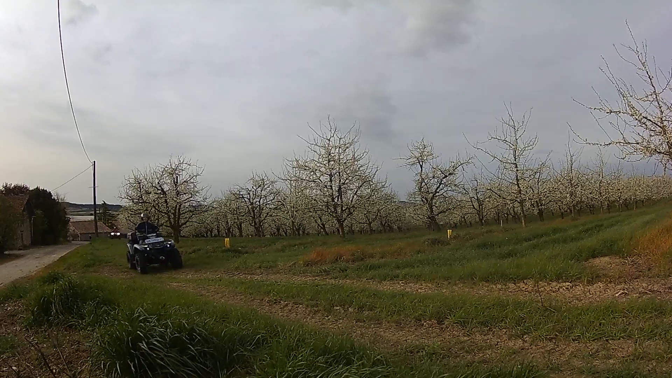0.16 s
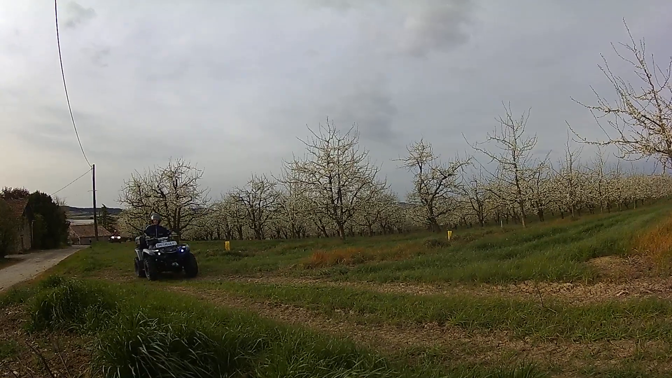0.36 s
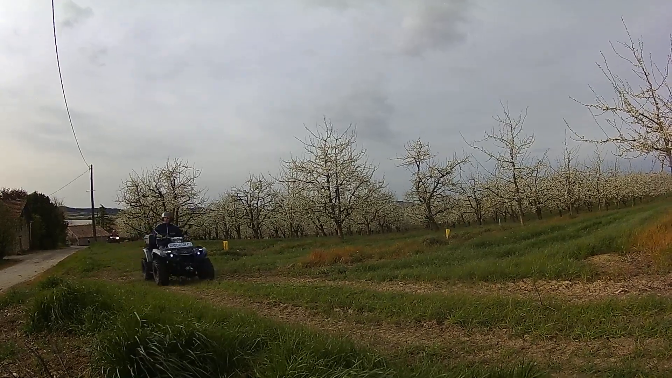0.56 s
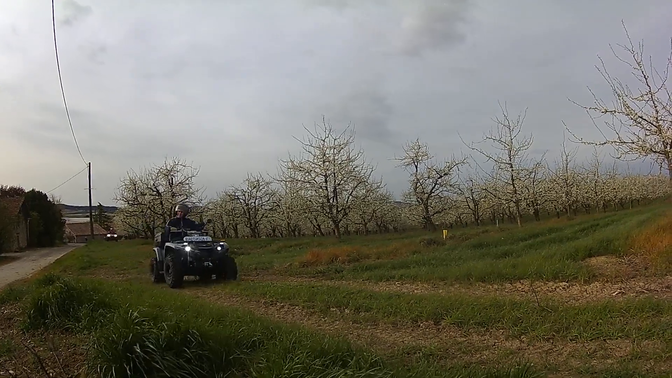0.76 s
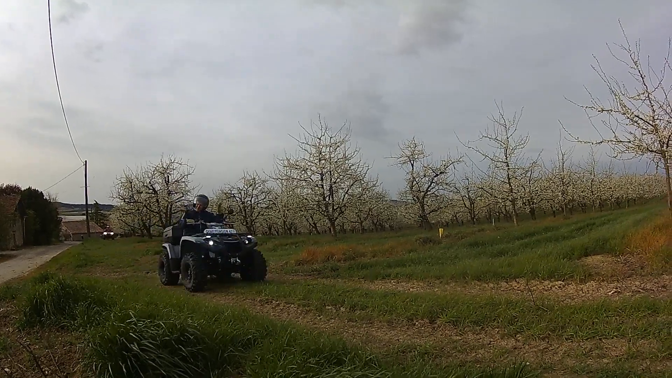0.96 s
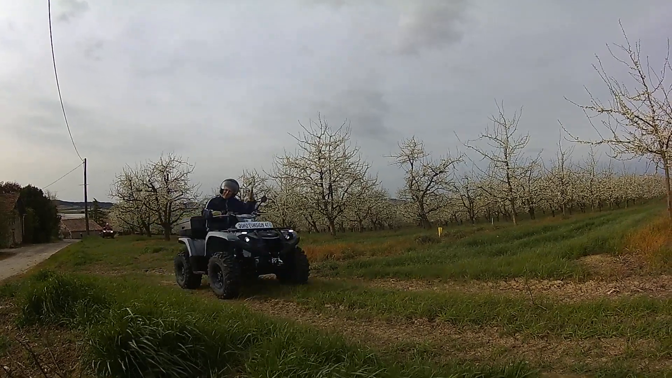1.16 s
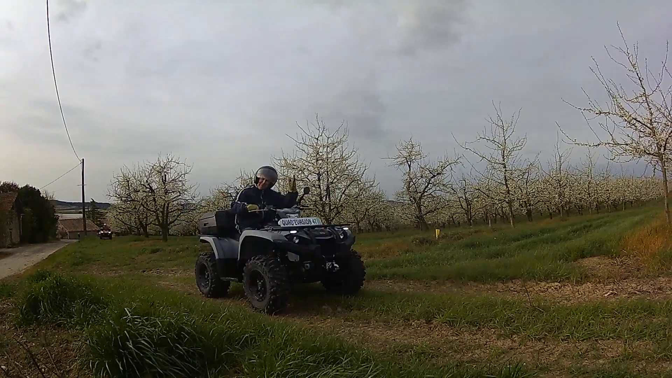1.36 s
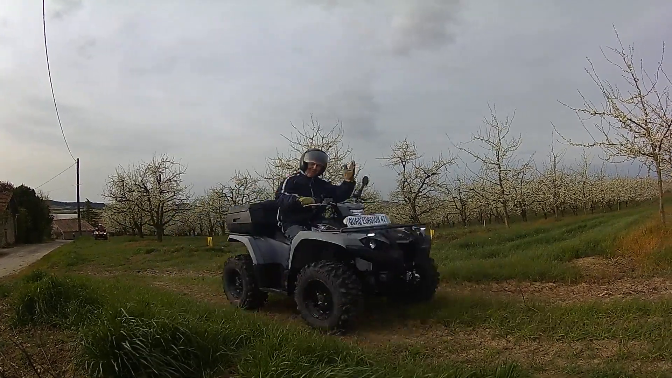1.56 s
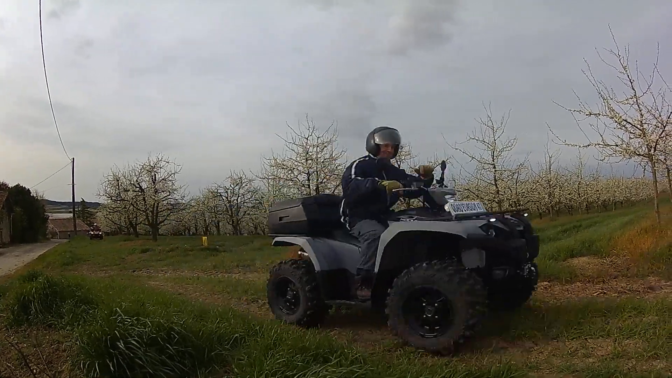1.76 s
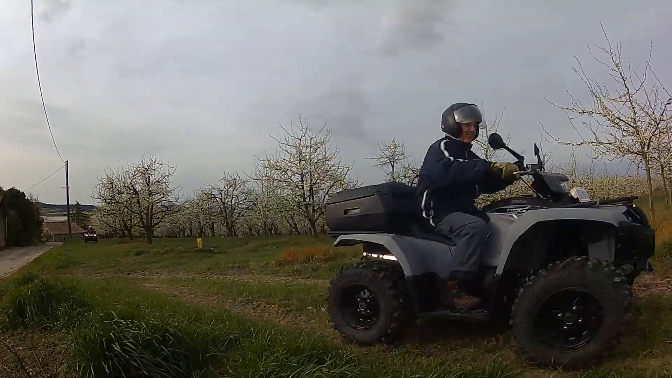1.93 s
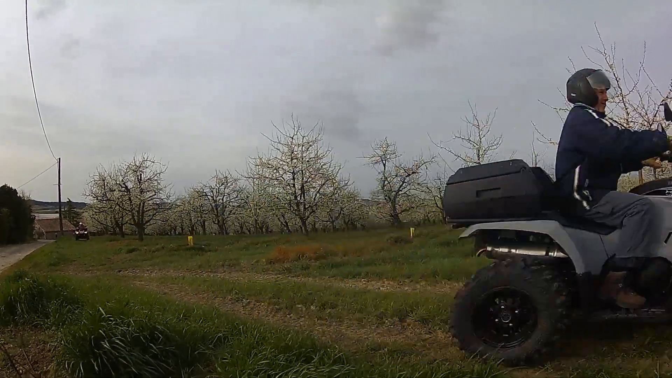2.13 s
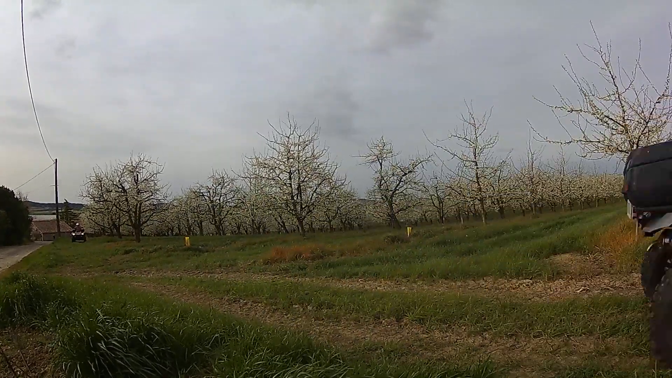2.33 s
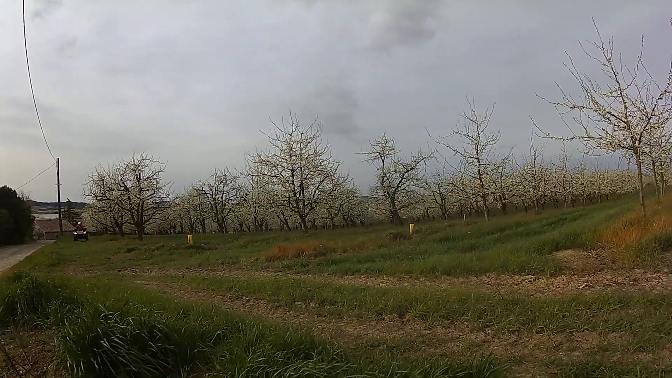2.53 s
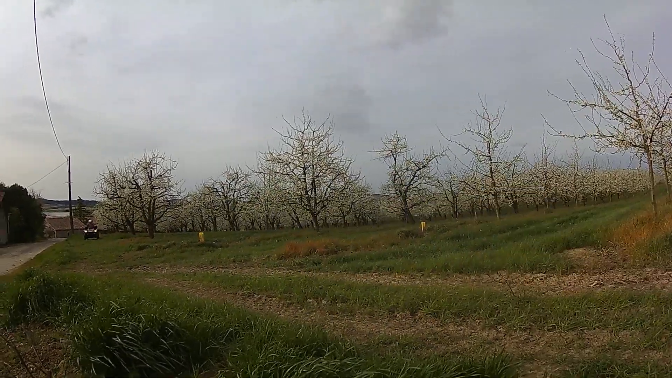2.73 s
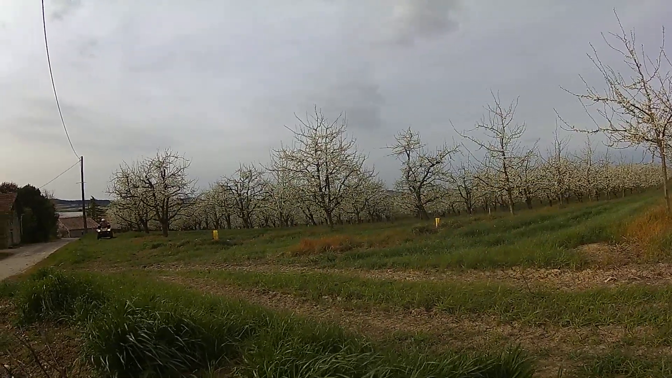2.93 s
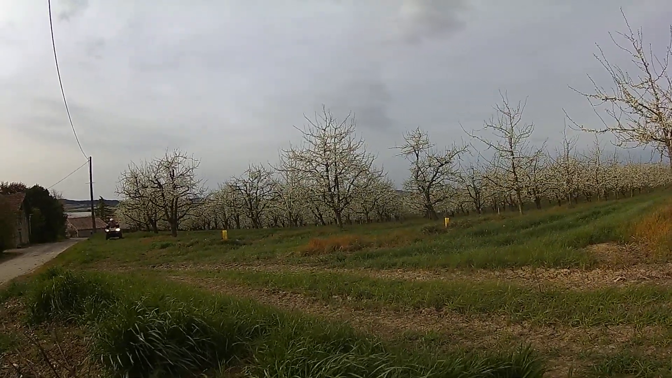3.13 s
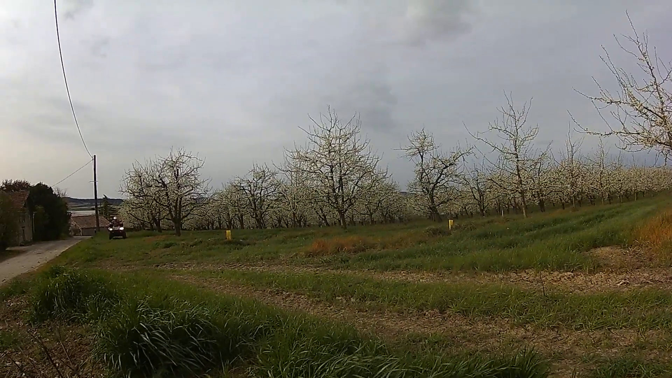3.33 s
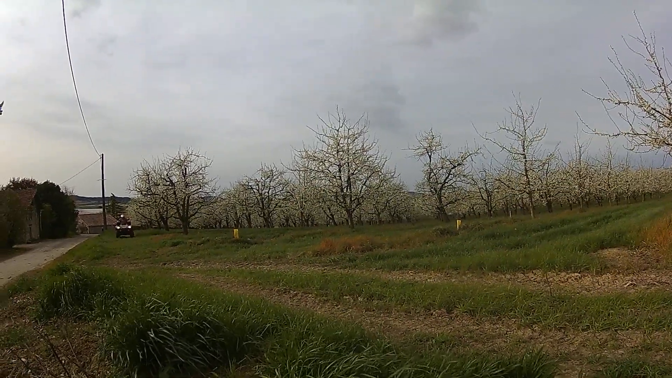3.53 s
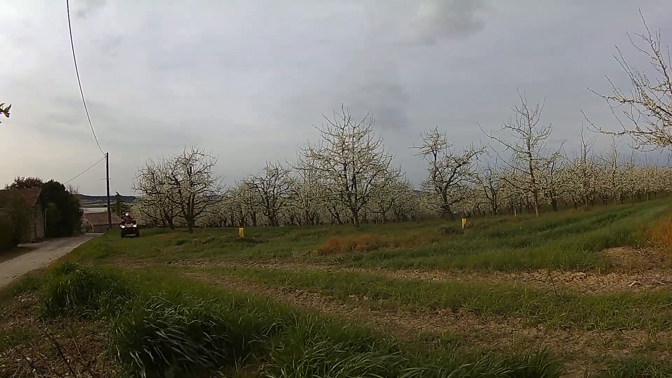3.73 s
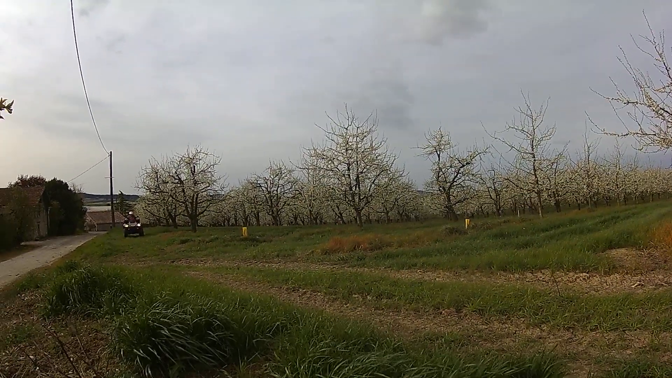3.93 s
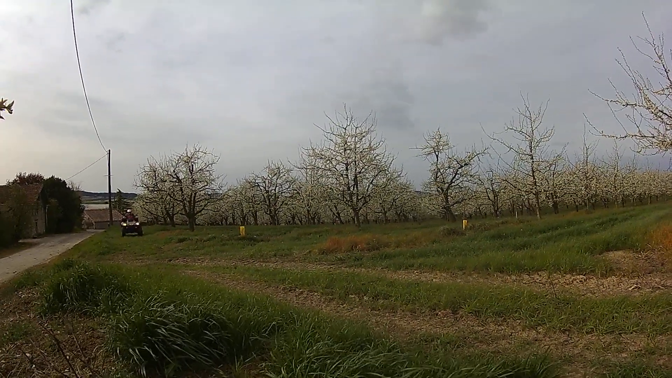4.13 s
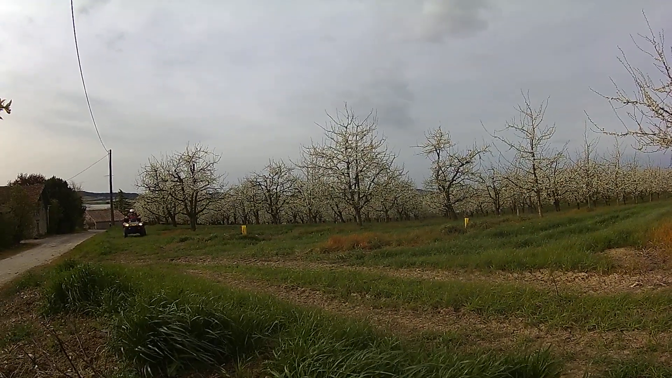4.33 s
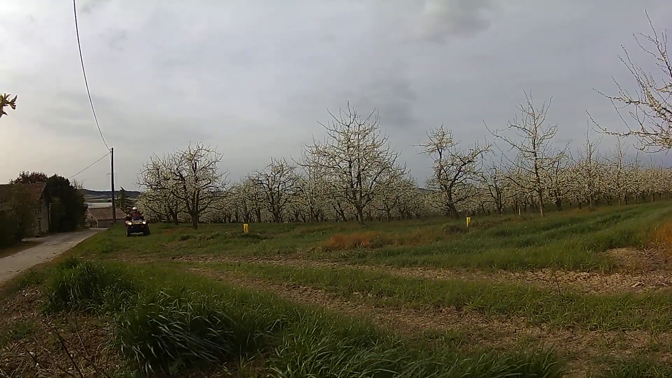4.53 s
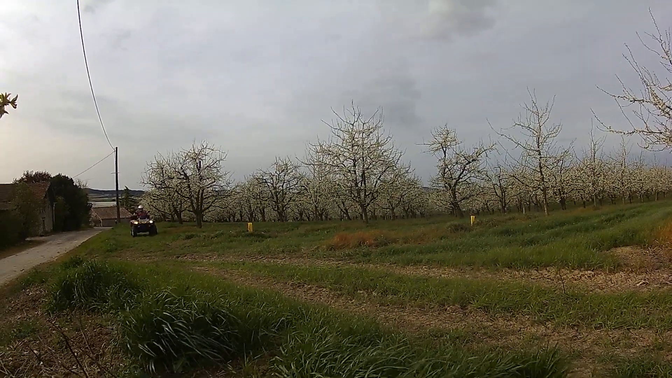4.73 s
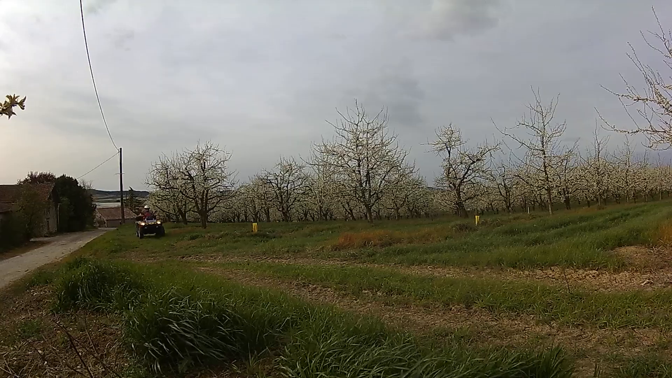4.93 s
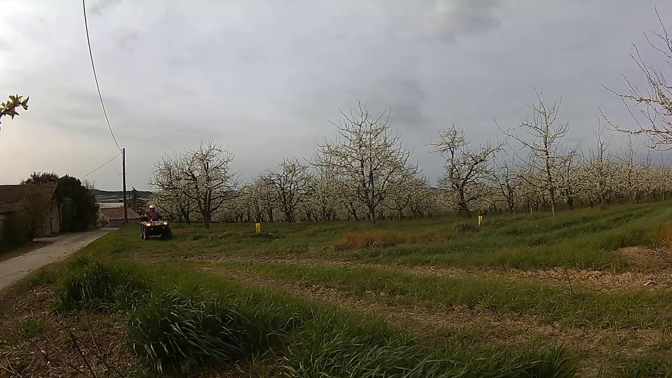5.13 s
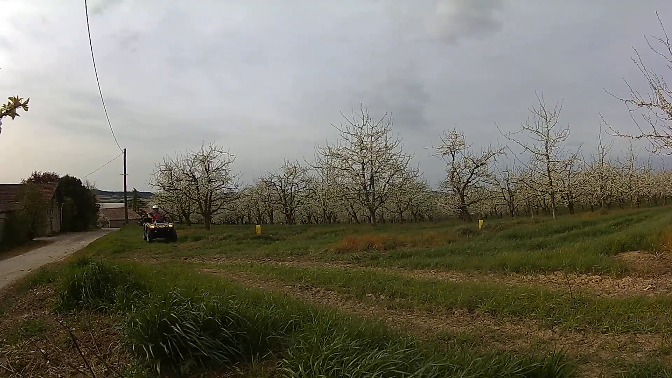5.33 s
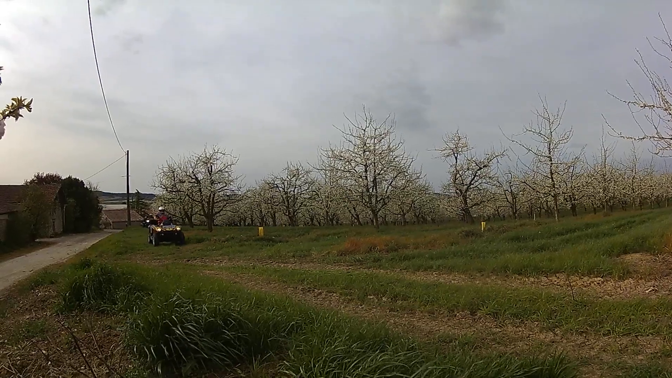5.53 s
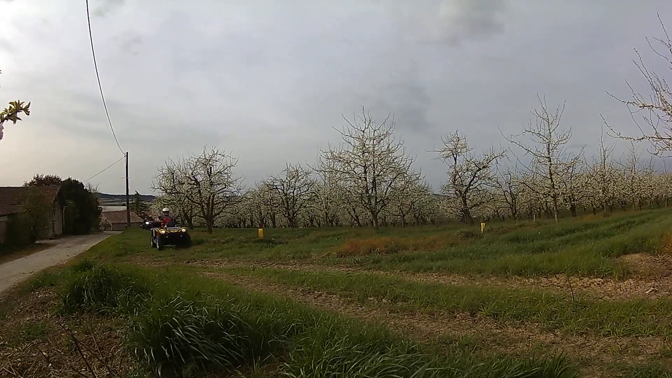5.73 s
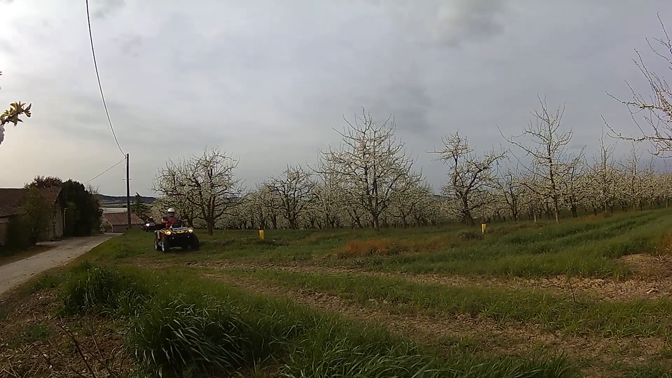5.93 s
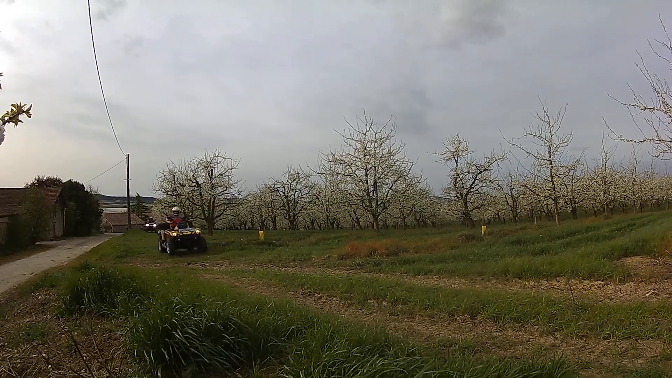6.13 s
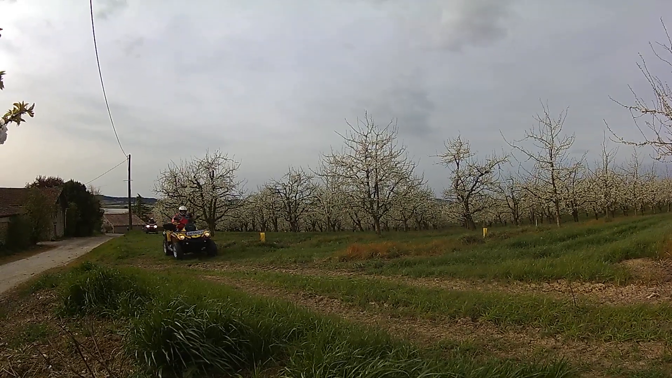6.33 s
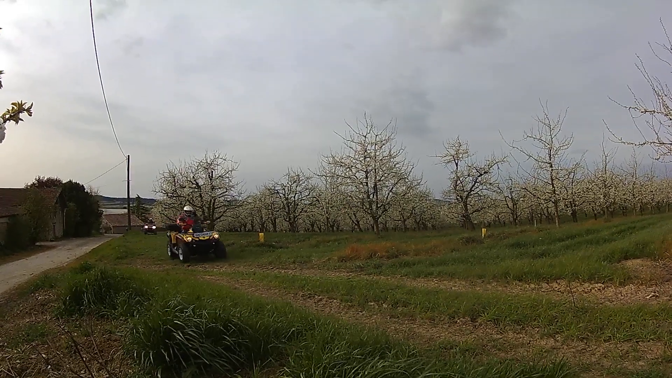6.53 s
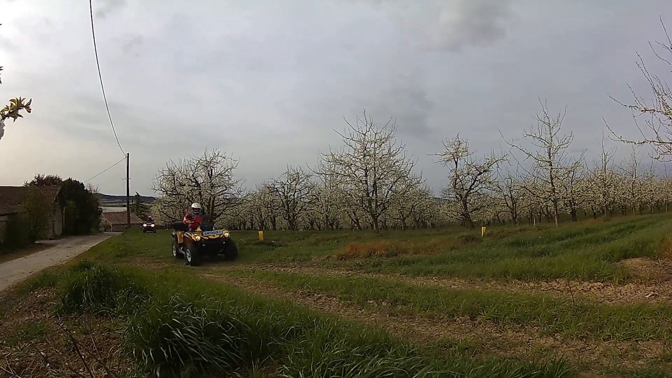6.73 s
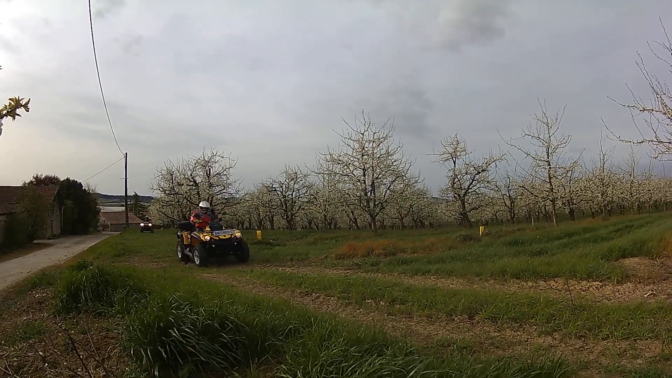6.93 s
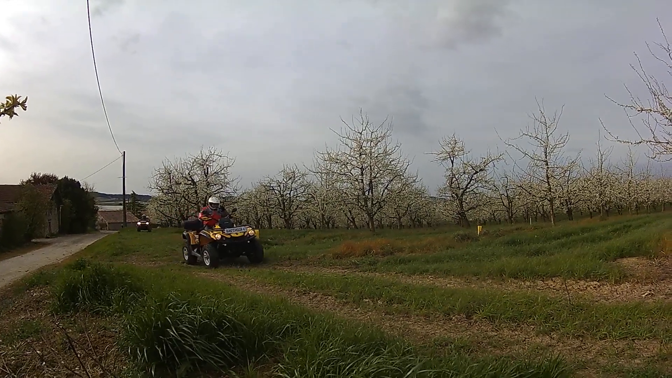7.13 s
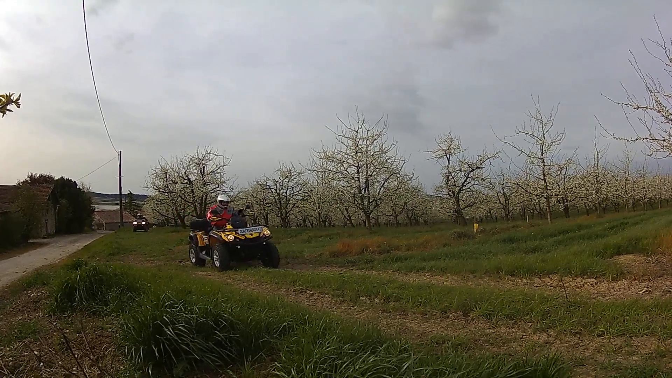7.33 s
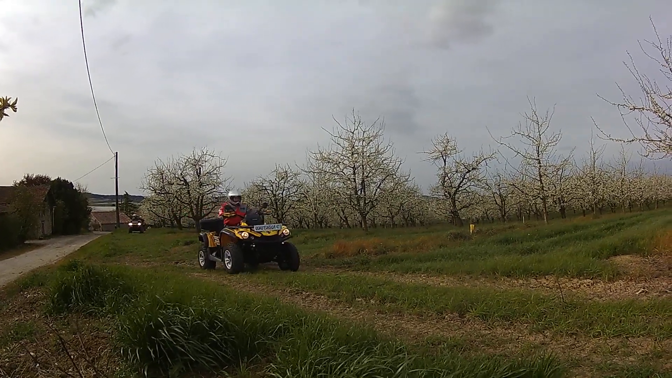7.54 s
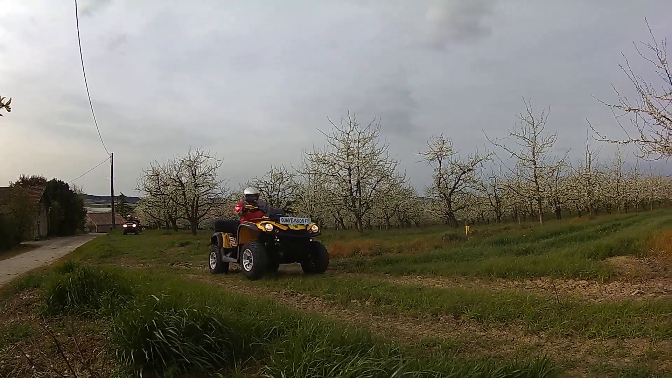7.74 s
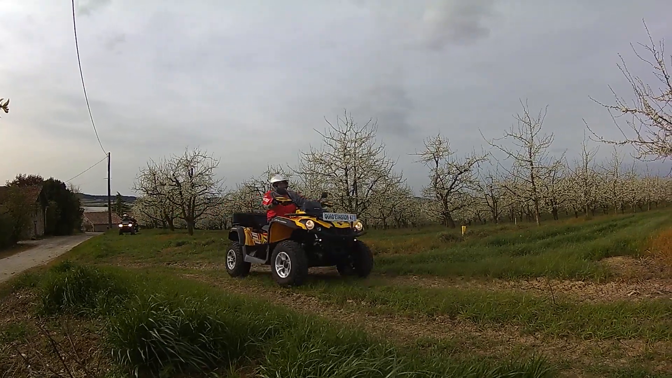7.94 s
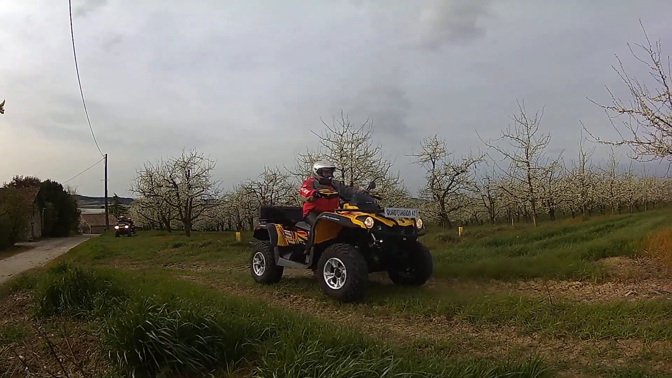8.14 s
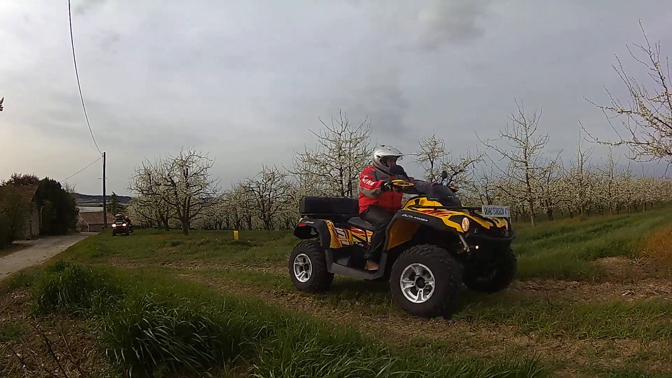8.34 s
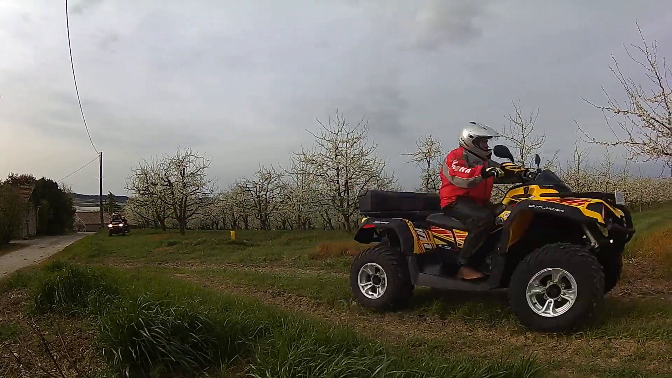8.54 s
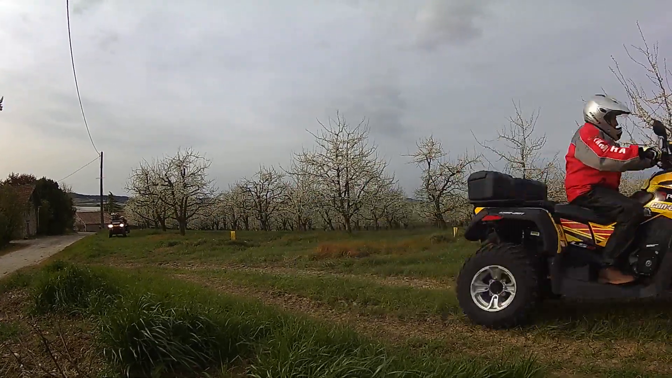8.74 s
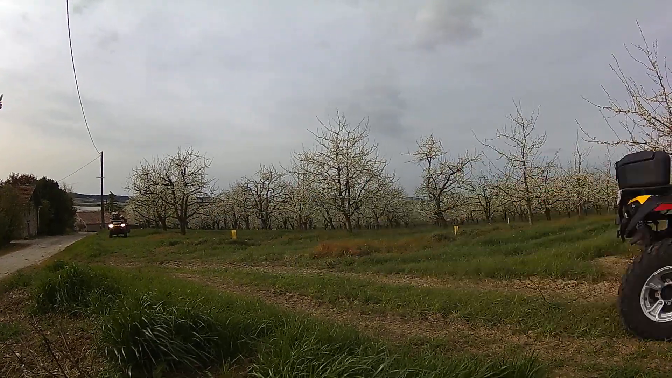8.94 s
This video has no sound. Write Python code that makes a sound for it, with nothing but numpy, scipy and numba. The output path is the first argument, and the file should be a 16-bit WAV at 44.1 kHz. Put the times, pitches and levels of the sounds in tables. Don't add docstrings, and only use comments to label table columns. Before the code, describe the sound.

Open countryside, with a boxy, nasal microphone sound and little treble. The first quad approaches with pulsing engine clatter and ringing panels, sweeps by, and leaves as rapid puttering pops under varying throttle. It dwindles to faint engine noise and wind. Then a second, smoother quad opens its throttle, its hum and tyre drone rising until it is right beside the microphone, still loud when the sound stops.

```python
import sys
import numpy as np
from scipy import signal
from scipy.fft import rfft, irfft
from scipy.io import wavfile
from scipy.ndimage import uniform_filter1d
from numba import njit

SR = 44100
rng = np.random.default_rng(int(sys.argv[2]) if len(sys.argv) > 2 else 0)


def dump_mix(stems):
    frames = np.atleast_2d(stems).T
    limited = np.clip(frames, -1, 1)
    pcm = np.round(limited * 32767).astype(np.int16)
    wavfile.write(sys.argv[1], SR, pcm)


def ratio(d):
    e = np.asarray(d, float) / 20
    return 10 ** e


N = 395999
TIME = np.arange(N) / SR
SINGLE_GONE_S = 6.2


def level(x, db):
    return x * ratio(db) / np.sqrt(np.mean(x ** 2))


def noise():
    return rng.standard_normal(N)


def columns(table):
    s, *rest = np.transpose(table)
    return [np.interp(TIME, s, c) for c in rest]


def walk(rate):
    k = int(SR / rate)
    steps = np.repeat(rng.standard_normal(N // k + 1), k)
    return 1.142 * uniform_filter1d(uniform_filter1d(steps, k), k)[:N]


@njit
def svf(x, hz, damp):
    band, high, b, l = np.empty(len(x)), np.empty(len(x)), 0., 0.
    for i in range(len(x)):
        g = np.tan(np.pi * hz[i] / SR)
        v = (b + g * (x[i] - l)) / (1 + g * (g + damp))
        band[i], high[i] = damp * v, x[i] - damp * v - l - g * v
        b, l = 2 * v - b, l + 2 * g * v
    return band, high


def ring(x, modes, wander=0., patchy_db=0.):
    out = np.zeros(N)
    for hz, width, db in modes:
        gain = ratio(db + patchy_db * walk(5))
        out += gain * svf(x, hz * (1 + wander * walk(3)), width / hz)[0]
    return out


def colour(x, points, notches=()):
    size = 2 ** 13
    hz = np.maximum(np.fft.rfftfreq(size, 1 / SR), 1)
    db = np.interp(np.log(hz), np.log(np.transpose(points)[0]), np.transpose(points)[1])
    for centre, width, depth_db in notches:
        db = db - depth_db / (1 + (2 * (hz - centre) / width) ** 2)
    cep = irfft(db * np.log(10) / 20)
    cep[1:size // 2] *= 2
    cep[size // 2 + 1:] = 0
    return signal.fftconvolve(x, irfft(np.exp(rfft(cep))))[:N]


def stack(cycles, orders, flutter_db, span=slice(None)):
    out = 0
    for k, db in orders:
        gain = np.sqrt(2) * ratio(db + flutter_db * walk(9)[span])
        out = out + gain * np.sin(2 * np.pi * (k * cycles[span] + rng.random()))
    return out


def humming(table, db, orders, flutter_db, waver=0., fade_s=0.09):
    since_start, until_end = TIME - table[0][0], table[-1][0] - TIME
    fade = np.clip((np.minimum(since_start, until_end) + fade_s) / fade_s, 0, 1)
    out, on = np.zeros(N), fade > 0
    cycles = np.cumsum(columns(table)[0] * (1 + waver * walk(20))) / SR
    out[on] = stack(cycles, orders, flutter_db, on)
    return fade * ratio(db) * out


# time in seconds, clatter level in dB.
PASS = [(0, -44.5), (.6, -43.5), (1.3, -38.5), (1.73, -28.5), (2.26, -23.5), (2.6, -31), (3.4, -35.5),
        (3.75, -41), (4.3, -46.5), (5.1, -46.5), (6.3, -51.5), (7.1, -46.5), (7.45, -44), (7.76, -39),
        (8.05, -35.5), (8.3, -30.5), (8.55, -25.5), (8.98, -27.5)]
# time in seconds, share from 0 to 1.
FACING = [
    (0, 0.58),
    (1.4, 0.94),
    (1.85, 0.87),
    (2.3, 0.29),
    (2.7, 0.3),
    (6.3, 0.42),
    (7.5, 0.98),
    (8.15, 0.77),
    (8.5, 0.37),
]


def passing():
    near_db = columns(PASS)[0]
    far_db = -22 - near_db
    return near_db, far_db, np.clip(columns(FACING)[0], 0, 1)


# centre in Hz, width in Hz, level in dB.
SINGLE_BODY = [(1394, 83, 1.5), (1590, 71, 7), (1850, 163, 3), (2013, 36, 3.5), (2450, 140, -4.5),
               (3415, 330, -7), (4750, 570, -10.5)]
TWIN_BODY = [(980, 61, -8.5), (1457, 58, 4.5), (1649, 60, 7), (1766, 94, -0.5), (2690, 50, -14.5),
             (3275, 153, 1), (3950, 210, -2.5)]
# centre in Hz, width in Hz, level in dB.
TWIN_INTAKE = [(1992, 83, 0)]


def bodywork(drive, intake_db):
    single = level(ring(drive, SINGLE_BODY, wander=0.012, patchy_db=1.5), 0)
    twin = level(ring(drive, TWIN_BODY, wander=0.012, patchy_db=1.5), 0)
    twin = twin + ratio(intake_db) * level(ring(drive, TWIN_INTAKE, wander=0.01, patchy_db=3.0), 0)
    twin_share = np.clip((TIME - 5.8) / 0.54, 0, 1)
    return np.sqrt(1 - twin_share) * single + np.sqrt(twin_share) * twin


def clatter(beat, aim_db, far_db, facing):
    pulsing = np.clip(0.18 + 0.35 * ratio(aim_db), 0, 1)
    swell = (1 - pulsing + 5.3 * pulsing * np.exp(-(beat % 1) / 0.75)) * ratio(0.58 * walk(14))
    ticks = (rng.random(N) < 500 / SR) * noise()
    ticks = ticks * ratio(.9 * rng.exponential(size=N))
    hiss = noise() * swell
    intake_db = -17.5 + 0.77 * far_db + 1.9 * twin_over_cruise()
    panels = bodywork(hiss + level(ticks, -3) * swell, intake_db)
    panel_db = -8 + 10 * facing
    return hiss, hiss + level(ticks, -24) + ratio(panel_db) * panels


def ground_dip(quads, far_db, facing):
    leaving_s = np.maximum(TIME - 2.51, 0) * (TIME < SINGLE_GONE_S)
    dip_hz = np.minimum(420 + 19.5 * far_db + 310 * leaving_s, 876)
    depth = np.clip((1.0 - 0.04 * far_db) * (1 - 0.63 * facing), 0, 1)
    return quads - depth * svf(quads, dip_hz, 0.87)[0]


def brightness(quads, facing):
    top = svf(quads, np.full(N, 2900.), 1.053)[1]
    return (ratio(11.5 - 5 * facing) - 1) * top


def swish(hiss, puff, aim_db, far_db, facing):
    rush = hiss * ratio(1.5 * walk(13) - 5.0) + ratio(0.45 * aim_db + 12.5) * puff
    for _ in range(2):
        rush = svf(rush, np.full(N, 6000.), 1.62)[1]
    return ratio(3.5 + 16.5 * facing + 0.21 * far_db) * rush


# frequency in Hz, gain in dB.
CASE = [(100, -33.5), (450, -17), (800, -6), (1300, -2), (2100, -2.5), (3000, -13.5), (4000, -32),
        (4800, -37.5), (5400, -41.5), (6600, -47.5), (9500, -65.5), (10600, -56), (12000, -70),
        (15500, -72.5)]
# centre in Hz, width in Hz, depth in dB.
CASE_NOTCHES = [
    (6036, 790, 26.5),
    (7840, 1190, 31),
]


def through_case(quads):
    return colour(quads, CASE, CASE_NOTCHES)


# frequency in Hz, level in dB per Hz.
WIND = [(20, -14.5), (48, -19), (65, -5), (112, -6), (170, -2), (300, -8), (500, -7.5), (800, -14),
        (1100, -46), (2500, -94.5)]


def wind_rumble(far_db):
    gusts = level(colour(noise(), WIND) * ratio(0.76 * walk(3.7)), 0.85)
    return gusts * ratio(-54.5 - 0.24 * far_db)


def case_hiss():
    points = [(3000, -15.5), (6000, -11.0), (9000, 6), (16000, 3.5)]
    return level(colour(noise(), points, CASE_NOTCHES), -82)


# frequency in Hz, level in dB.
WHISTLE = [(10998, -92)]


def whistle():
    return sum(ratio(db) * np.sqrt(2) * np.sin(2 * np.pi * hz * TIME) for hz, db in WHISTLE)


# time in seconds, cycles per second, hum level in dB.
TWIN_GONE = [
    (.1, 38.5, -57),
    (.35, 38, -65),
    (.55, 37, -67),
]
# multiple of the cycle speed, level in dB.
TWIN_ORDERS = [(1, -24), (2, -5.5), (3, -9), (4, -17), (5, -28), (6, -1), (7, -24.5), (8, -11), (9, -11.5),
               (10, -13), (11, -18), (12, -27), (13, -26), (14, -22), (15, -24.5), (16, -19.5), (17, -17),
               (18, -14), (19, -12), (20, -12.5), (21, -26), (22, -16.5), (23, -2.5), (24, -11), (25, -9.5),
               (26, 3.5), (27, 7), (28, -7.5), (29, -7), (30, -3.5)]


def leaving_twin():
    return humming(TWIN_GONE, columns(TWIN_GONE)[1], TWIN_ORDERS[1:3], flutter_db=6.5)


# start in seconds, length in seconds, level in dB.
BRUSHES = [
    (0.163, 0.037, -65.5),
    (0.29, .012, -73),
    (7.49, 0.22, -72),
    (8.498, 0.0087, -63.5),
]


def brushing():
    gate = sum(ratio(db) * ((TIME > s) & (TIME < s + length)) for s, length, db in BRUSHES)
    points = [(2500, -8.5), (4500, 18.5), (6500, 7.0), (11000, 2.5), (16000, -10.0)]
    hiss = colour(noise(), points, CASE_NOTCHES)
    return level(hiss, 0) * uniform_filter1d(gate, int(.002 * SR))


# start in seconds, peak in dB, pitch in Hz, ring in seconds.
KNOCKS = [(.166, -29.5, 1350, 0.012), (.2895, -30, 2800, 0.013), (.294, -26.5, 2400, 0.031),
          (4.47, -47, 4300, 0.087), (4.868, -52, 5000, .04), (7.28, -44, 600, 0.033),
          (4.457, -36.5, 1400, 0.03), (4.703, -36, 1350, 0.038), (8.42, -18.5, 1660, 0.036),
          (8.504, -16.5, 1707, 0.024), (8.561, -14, 1753, 0.022)]


def knocks():
    out = np.zeros(N)
    age = np.arange(int(.12 * SR)) / SR
    for s, db, hz, ring_s in KNOCKS:
        decay = np.exp(-np.log(1000) * age / np.clip(ring_s, .005, .1))
        hit = rng.standard_normal(len(age)) * decay
        for _ in range(2):
            hit = svf(hit, np.full(len(age), 1. * hz), 0.52)[0]
        start = int(s * SR)
        out[start:start + len(age)] += ratio(db) * hit / np.abs(hit).max()
    return colour(out, [(3500, 1.5), (5000, -15), (6000, -39), (16000, -54)])


# time in seconds, knobs per second.
TREADS = [
    [(.25, 256), (.5, 240), (.7, 243), (.85, 217), (1.05, 208)],
    [(4.3, 226), (5.5, 225)],
    [(5.8, 207), (6.15, 188)],
    [(7.05, 206), (7.32, 209), (7.48, 232), (7.82, 215), (7.98, 231), (8.2, 233), (8.43, 251), (8.58, 243),
     (8.9, 259)],
]
TREAD_RUN_DB = [-4, -5, -6, -1.5]
# multiple of the knob rate, level in dB.
TREAD_ORDERS = [(2.14, -8), (3, -4), (4, 0)]


def tyre_treads(near_db, far_db):
    tread_db = near_db - 22 + .25 * far_db
    out = np.zeros(N)
    for table, run_db in zip(TREADS, TREAD_RUN_DB):
        out += humming(table, tread_db + run_db, TREAD_ORDERS, flutter_db=3.0, waver=.004)
    return out


# time in seconds, firings per second.
FIRING = [(1.3, 27.78), (1.75, 29.46), (2.05, 33.5), (2.5, 34.01), (2.75, 33.45), (3.2, 36.34),
          (3.4, 35.69), (3.6, 37.53), (3.85, 33.94), (4.1, 33.27), (4.7, 31.01), (5.2, 34.65), (5.8, 32.49)]


def single_cycles():
    turns = np.cumsum(columns(FIRING)[0]) / SR
    return turns - turns[int(1.6 * SR)] + .49


# time in seconds, level in dB.
PIPE_AIM = [
    (1.2, -30.5),
    (1.8, -17),
    (2.2, -5.5),
    (2.85, -1.5),
    (3.55, -5),
    (4.3, -23),
    (4.9, -7.5),
    (5.4, -11),
    (6.0, -39.5),
]


def single_pipe_aim():
    return columns(PIPE_AIM)[0]


# centre in Hz, width in Hz, level in dB.
PIPE = [(1330, 37, -25.5), (1820, 570, 2.5), (600, 100, 4), (2600, 1600, -3)]


def tail_pipe(cycles):
    pop_hz = 989 + 425 * np.maximum(TIME - 2.51, 0)
    count = np.floor(cycles - np.floor(cycles[0])).astype(int)
    size = ratio(1.1 * rng.standard_normal(count[-1] + 1))[count]
    firings = np.diff(count, prepend=0) * size
    firings = firings + 0.27 * np.roll(firings, int(0.00578 * SR))
    age = np.arange(int(.0032 * SR)) / SR
    sweep = np.hanning(len(age)) * np.sin(2 * np.pi * (480 * age + 2.7e5 * age ** 2))
    pops = np.convolve(firings, sweep)[:N]
    for _ in range(2):
        pops = svf(pops, pop_hz, .9)[0]
    thumps = np.convolve(firings, np.hanning(int(0.00071 * SR)), "same")
    rings = level(ring(thumps, PIPE), -4.5)
    since = cycles % 1
    puff = level(size * since * np.exp(-since / 0.13) * noise(), 0)
    thin_puff = svf(puff, np.full(N, 1700.), 0.81)[1]
    direct = ratio(2.0) * (level(pops, 0) + rings) + ratio(4) * thin_puff
    echo = np.interp(TIME - 1 / pop_hz, TIME, direct)
    return direct + 0.32 * echo, puff


# multiple of the firing rate, level in dB.
SINGLE_ORDERS = [(1, -23), (2, -4), (3, -9.5), (4, -7), (5, -14.5), (6, -17.5), (7, -5), (8, -4.5),
                 (9, -7.5), (10, -10), (11, -10.5), (12, -13.5), (13, -13), (14, -18), (15, -9.5),
                 (16, -4.5), (17, -11), (18, -3.5), (19, -3), (20, -4.5)]


def single_boom(cycles, near_db, aim_db):
    return ratio(near_db + .6 * aim_db - 25) * stack(cycles, SINGLE_ORDERS, flutter_db=0.5)


# time in seconds, cycles per second.
TWIN = [
    (6.5, 29.9),
    (6.9, 30.28),
    (7.07, 33.5),
    (7.27, 35.36),
    (7.49, 39.7),
    (7.76, 38.4),
    (8.3, 39.47),
    (8.56, 38.1),
    (8.98, 39),
]


def twin_over_cruise():
    return columns(TWIN)[0] - 39


# time in seconds, level in dB.
TWIN_PIPE_AIM = [
    (7.9, -22),
    (8.3, -5),
    (8.6, -2),
    (8.98, 8.5),
]


def twin_hum(near_db, far_db):
    hum_db = near_db - 29 + 0.16 * far_db + 2.5 * twin_over_cruise()
    low = humming(TWIN, hum_db, TWIN_ORDERS[:10], flutter_db=1.0)
    upper_db = hum_db + columns(TWIN_PIPE_AIM)[0]
    return low + humming(TWIN, upper_db, TWIN_ORDERS[10:], flutter_db=4.0)


def scene():
    near_db, far_db, facing = passing()
    aim_db = single_pipe_aim()
    cycles = single_cycles()
    twin_cycles = np.cumsum(columns(TWIN)[0]) / SR
    beat = np.where(TIME < SINGLE_GONE_S, cycles, 2 * twin_cycles)
    hiss, rattle = clatter(beat, aim_db, far_db, facing)
    exhaust, puff = tail_pipe(cycles)
    quads = ground_dip(rattle + ratio(aim_db) * exhaust, far_db, facing)
    quads = quads + brightness(quads, facing) + swish(hiss, puff, aim_db, far_db, facing)
    heard = through_case(quads * ratio(near_db + 7))
    engines = single_boom(cycles, near_db, aim_db) + leaving_twin() + twin_hum(near_db, far_db)
    background = wind_rumble(far_db) + case_hiss() + whistle()
    touches = knocks() + brushing()
    return (heard + engines + tyre_treads(near_db, far_db) + background + touches)[None]


def roll_off(x):
    return signal.sosfilt(signal.butter(12, 15830, fs=SR, output="sos"), x)


def record(dry):
    mix = dry * np.clip((TIME[-1] - TIME) / .003, 0, 1)
    return roll_off(mix)


dry = scene()
out = record(dry)
dump_mix(out)
```